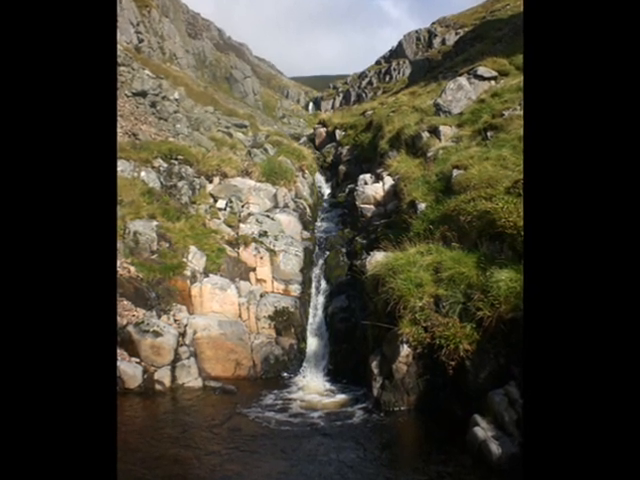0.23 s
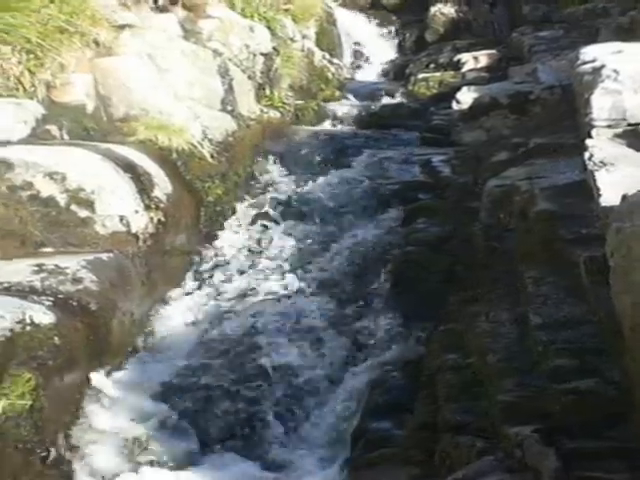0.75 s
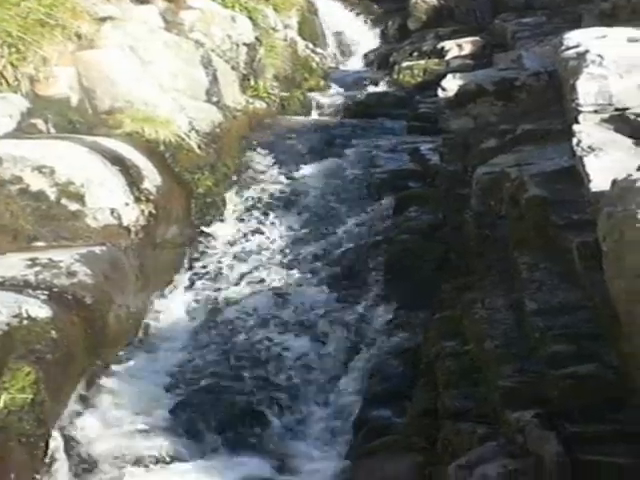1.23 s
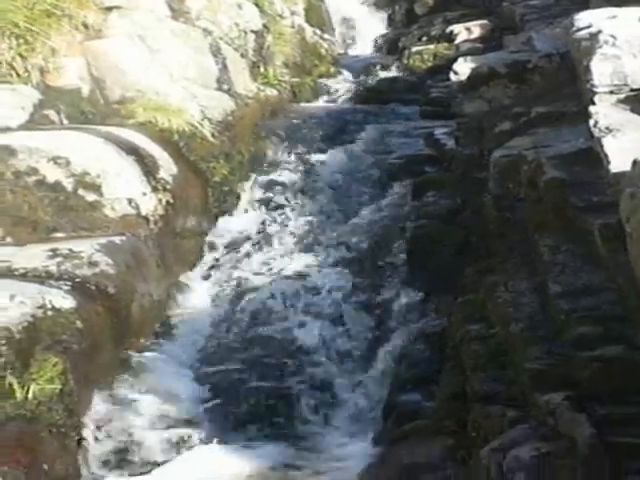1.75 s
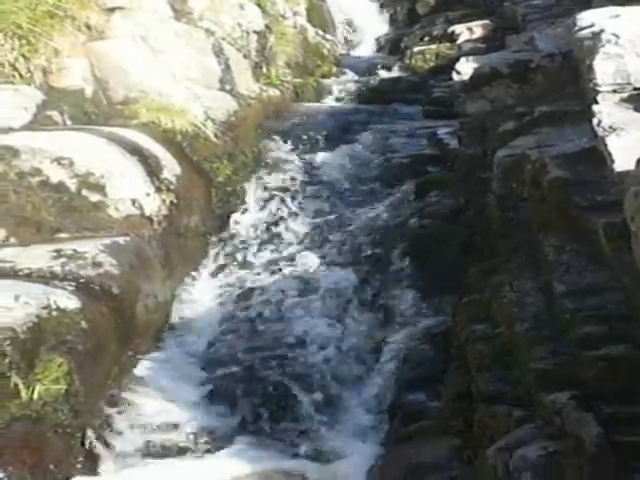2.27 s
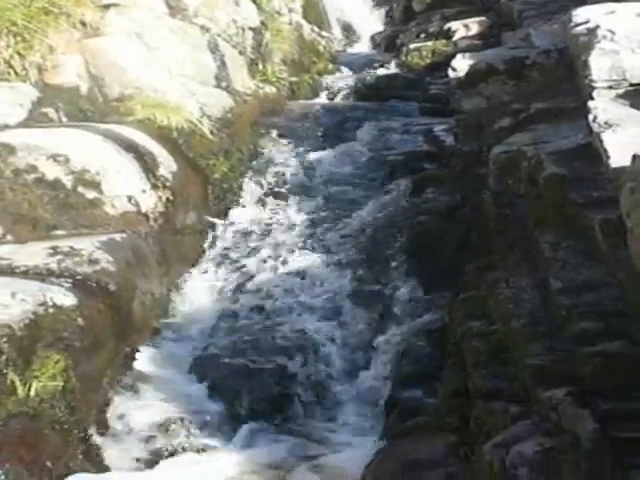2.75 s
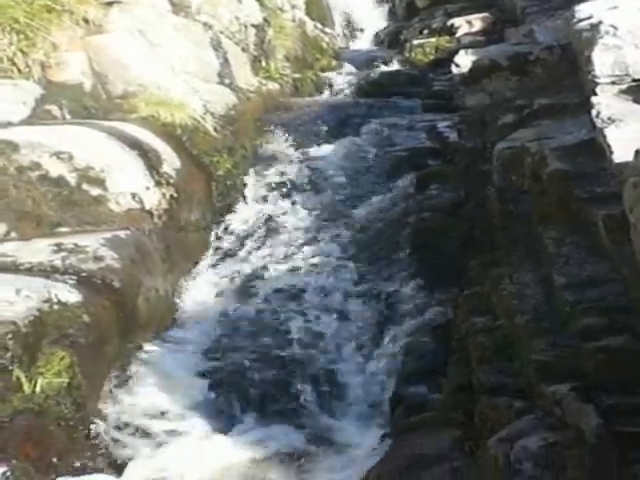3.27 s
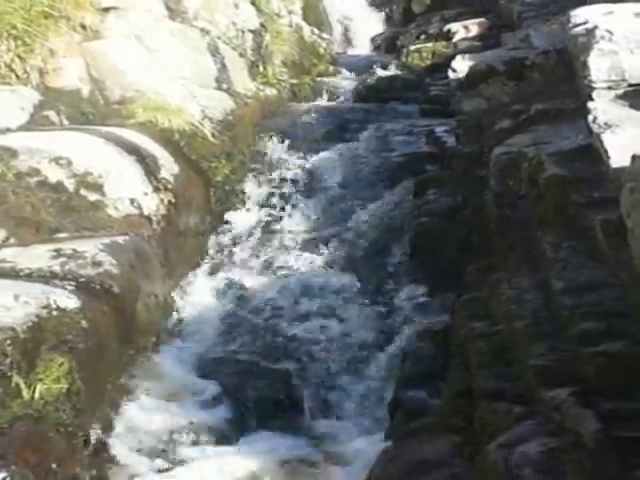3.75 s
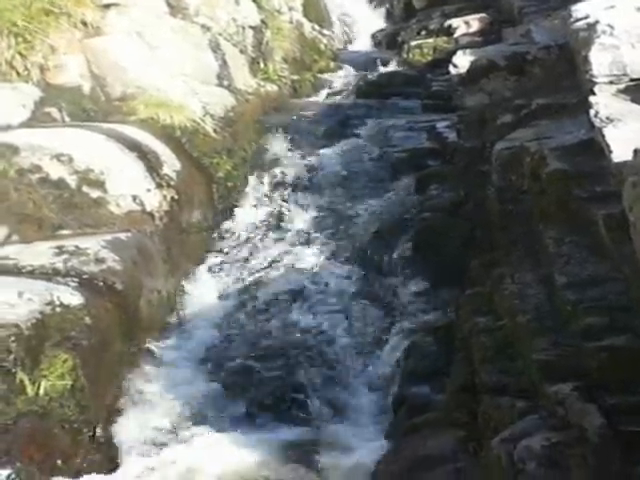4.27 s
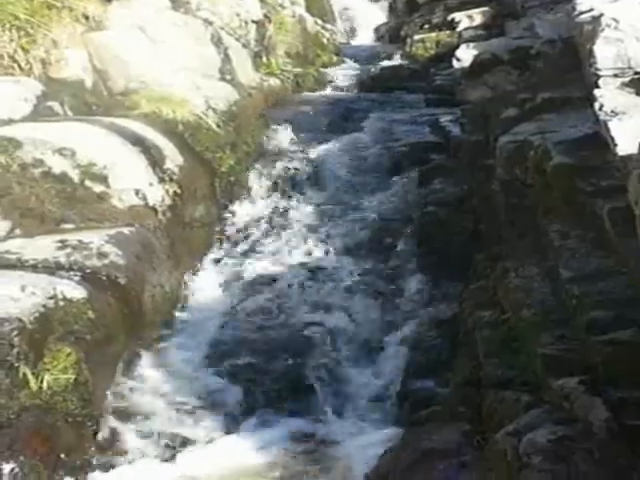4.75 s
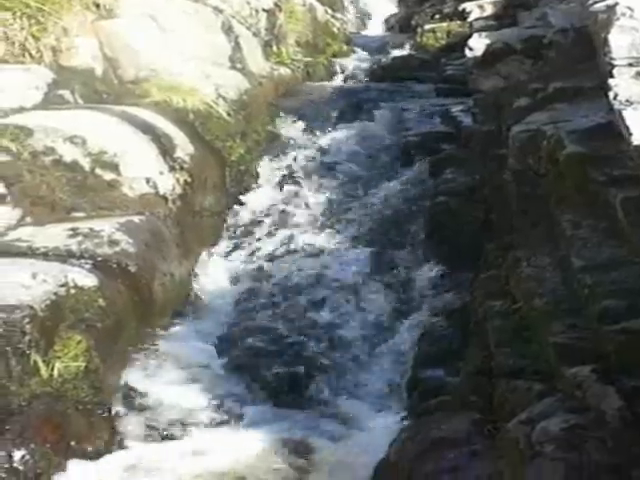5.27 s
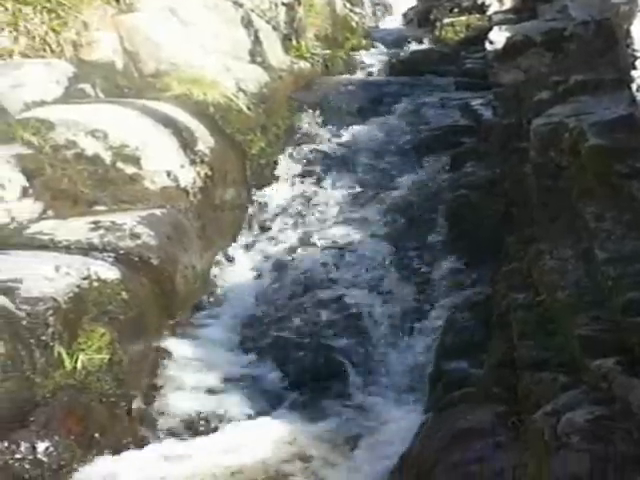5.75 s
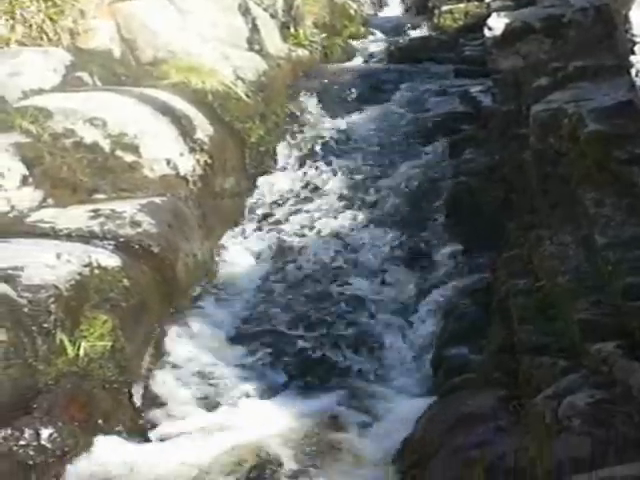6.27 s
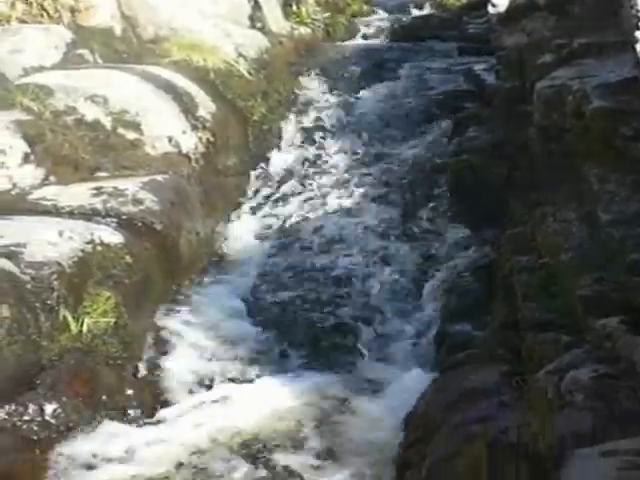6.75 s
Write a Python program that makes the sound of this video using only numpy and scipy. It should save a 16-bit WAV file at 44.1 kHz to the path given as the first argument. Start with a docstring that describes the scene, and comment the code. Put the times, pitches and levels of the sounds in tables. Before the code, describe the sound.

Complete silence for the first 0.75 seconds. Then a mountain stream cascading down a rock chute enters softly and swells to full level by about 1.1 seconds. It is a loud, close, broad rush of white water, strongest in the middle range, with little deep bass and a soft top. The level stays steady, only flickering quickly as foam tumbles. Inside it are countless ringing bubbles, low hollow gurgles between rocks and fine ticking spray. Tiny drops slap near 0.8, 1.5, 4.2 and 4.8 seconds; faint rising bubble plops come near 1.35, 3.45, 5.3, 6.3 and 6.6. From about 5.5 seconds a light breeze rumbles on the microphone, with short gusts from 5.7. Around 6.5 a soft bump, then strong low buffeting thumps at 6.7 to 7.0, slightly distorted, the water ducking beneath them until the end.

```python
"""After a silence, a mountain stream cascading down a rock chute fades in.
Octave bands of noise make its white water; random impulses in resonators make bubbles, gurgles and spray.
Bursts of noise slap as drops and rising tones plop as single bubbles over this steady rush.
Near the end wind reaches the microphone: coloured noise rumbles, short pressure swings buffet,
and the limiter ducks the water."""
import sys
import numpy as np
from scipy import signal
from scipy.fft import rfft, irfft, next_fast_len
from scipy.io import wavfile

SR = 44100
rng = np.random.default_rng(int(sys.argv[2]) if len(sys.argv) > 2 else 0)


def digitize_waveform(pressure):
    """Quantize a signal to 16-bit integers and store it at the path in sys.argv[1].

    Rows of a 2-D input are taken as channels; values are limited to [-1, 1].
    """
    field = np.atleast_2d(pressure).T
    bounded = np.clip(field, -1, 1)
    quanta = np.round(bounded * 32767).astype(np.int16)
    wavfile.write(sys.argv[1], SR, quanta)


N = 309582
TIME = np.arange(N) / SR  # seconds


def from_db(db):
    """Level to amplitude: 20 dB is a factor of ten."""
    return 10 ** (np.asarray(db) / 20)


def rms_one(x):
    """Normalise the power: scale to rms 1."""
    return x / np.sqrt(np.mean(x ** 2) + 1e-20)


def at_hz(points, hz):
    """Interpolate a spectrum in dB along a logarithmic frequency axis."""
    f, db = np.transpose(points)
    return np.interp(np.log(np.maximum(hz, 1)), np.log(f), db)


def butter(x, hz, kind, order=2):
    """Causal Butterworth filter, maximally flat in its passband."""
    sections = signal.butter(order, hz, kind, fs=SR, output="sos")
    return signal.sosfilt(sections, x + 1e-18)


def noise(spectrum):
    """Coloured noise: white noise weighted in the frequency domain, rms 1."""
    size = next_fast_len(N)
    hz = np.fft.rfftfreq(size, 1 / SR)
    white = rfft(rng.standard_normal(size))
    return rms_one(irfft(white * from_db(at_hz(spectrum, hz)), size)[:N])


def drift(rate_hz):
    """Slow random fluctuation: noise through two equal low-pass poles, rms 1."""
    step, settling = 40, 2000  # samples per slow point; slow points dropped at the start
    r = np.exp(-2 * np.pi * rate_hz * step / SR)
    white = rng.standard_normal(N // step + settling + 2)
    slow = signal.lfilter([1], [1, -2 * r, r * r], white)[settling:]
    return np.interp(np.arange(N) / step, np.arange(len(slow)), rms_one(slow))


def grains(per_s, spread_db):
    """Poisson-like impulses of either sign: many small, a few large."""
    born = np.flatnonzero(rng.random(N) < per_s / SR)
    chance = rng.random((len(born), 2))
    size = -np.log(np.maximum(chance[:, 0], np.exp(-4)))  # exponential chance, capped at 4
    out = np.zeros(N)
    out[born] = from_db(spread_db * size) * np.sign(chance[:, 1] - .5)
    return out


def resonate(x, hz, width_hz):
    """One damped resonance, a pole pair whose radius sets the bandwidth, rms 1."""
    r = np.exp(-np.pi * width_hz / SR)
    poles = [1, -2 * r * np.cos(2 * np.pi * hz / SR), r * r]
    return rms_one(signal.lfilter([1, 0, -1], poles, x + 1e-18))


def rush(surge, level_db, flicker_db, flicker_rate_hz, surge_db):
    """White water as modulated noise: tumbling foam makes each band below 6400 Hz flicker by itself."""
    # colour of the roar: f/Hz, relative level/dB per Hz
    rush_spectrum = [(25, -26), (55, -20.5), (100, -16.5), (165, -7.5), (250, -6), (600, -5.5), (900, -1.5),
                     (1600, -4.5), (2400, -4.5), (3500, -9.5), (5000, -11.5), (7000, -12), (9500, -12),
                     (12500, -14)]
    rest, flickering = noise(rush_spectrum), 0
    for edge in np.geomspace(200, 6400, 6):  # octave steps
        # forward and backward filtering keeps the phase, so the bands sum exactly
        low_pass = signal.butter(3, edge, fs=SR, output="sos")
        band = signal.sosfiltfilt(low_pass, rest)
        flickering = flickering + band * from_db(flicker_db * drift(flicker_rate_hz))
        rest = rest - band
    return from_db(level_db + surge_db * surge) * rms_one(flickering + rest)


def bubbles(surge, level_db, per_s, spread_db, q, surge_db, count=28):
    """Bubble resonance: trapped air rings for a few cycles, and small bubbles outnumber large ones."""
    # bubbles from large to small: f/Hz, relative level/dB per band
    bubble_levels = [(220, -13.5), (450, -3), (900, 0.5), (2000, -0.5), (4000, -3.5)]
    births = per_s * from_db(surge_db * surge)
    pitches = np.geomspace(bubble_levels[0][0], bubble_levels[-1][0], count)
    shares = pitches / pitches.sum()
    out = 0
    for hz, share in zip(pitches, shares):
        ringing = resonate(grains(births * share, spread_db), hz, hz / q)
        out = out + from_db(at_hz(bubble_levels, hz)) * ringing
    return from_db(level_db) * rms_one(out)


def gurgles(per_s, spread_db):
    """Cavity resonance: slugs of plunging water set the hollows between the rocks gulping."""
    # hollows: f/Hz, bandwidth/Hz, rms level/dB
    hollows = [(251.5, 49, -34.5), (388, 45, -34), (504, 71, -29), (810, 83, -33)]
    out = 0
    for hz, width_hz, db in hollows:
        out = out + from_db(db) * resonate(grains(per_s, spread_db), hz, width_hz)
    return out


def spray(surge, level_db, per_s, spread_db, low_hz, high_hz, q, surge_db, count=8):
    """Heavily damped ringing: droplets land and foam bursts in ticks of a cycle or two."""
    births = per_s / count * from_db(surge_db * surge)
    ticks = 0
    for hz in np.linspace(low_hz, high_hz, count):
        ticks = ticks + resonate(grains(births, spread_db), hz, hz / q)
    return from_db(level_db) * rms_one(ticks)


def splats(level_db, decay_s, q):
    """Exponential decay of band noise: flung drops burst on the near rock in a brief, broad patter."""
    # drops: onset t/s, relative level/dB, centre f/Hz
    drops = [(.818, -13, 4500), (1.47, -14, 3500), (4.183, -19, 5200), (4.260, -19, 6200),
             (4.702, -19, 5100), (4.854, -15, 3600)]
    out = 0
    for start_s, db, hz in drops:
        dying = (TIME >= start_s) * np.exp(-np.clip((TIME - start_s) / decay_s, 0, 20))
        patter = resonate(rng.standard_normal(N), hz, hz / q)
        out = out + from_db(db + level_db) * dying * patter
    return out


def plops(level_db, ring_cycles, rise_per_s):
    """Bubble chirp: a bubble pinches off near by and its pitch climbs as it nears the surface."""
    # loudest single bubbles: onset t/s, relative peak level/dB, starting f/Hz
    single_bubbles = [(1.351, -12, 940), (3.451, -15, 1860), (5.291, -13, 1870), (6.310, -11.5, 1250),
                      (6.600, -10.5, 1670)]
    out = np.zeros(N)
    for start_s, db, hz in single_bubbles:
        ring_s = ring_cycles / hz
        age = np.clip(TIME - start_s, 0, 20 * ring_s)
        swell = age / ring_s * np.exp(1 - age / ring_s)  # peaks at 1 after ring_s
        cycles = hz * age * (1 + rise_per_s * age / 2)  # integral of the rising pitch
        out += from_db(db + level_db) * swell * np.sin(2 * np.pi * cycles)
    return out


def envelope(start_s, length_s, attack_s, release_s):
    """Piecewise-linear amplitude: rise up to the start, hold for the length, fall away."""
    rise = np.clip(1 + (TIME - start_s) / attack_s, 0, 1)
    fall = np.clip(1 - (TIME - start_s - length_s) / release_s, 0, 1)
    return rise * fall


def wind(rumble_db):
    """Turbulent pressure noise on the microphone port; the breeze and its gusts add in power."""
    # colour of the rumble: f/Hz, relative level/dB per Hz
    rumble_spectrum = [(20, -21), (60, -4), (120, -1.5), (250, -5), (450, -12.5), (1000, -30), (3000, -52)]
    # gusts on top of the breeze: start t/s, length/s, relative level/dB
    gust_list = [(5.70, 0.088, -35), (6.037, .055, -26.5), (6.28, 0.064, -34), (6.468, 0.06, -25),
                 (6.796, 0.075, -18), (6.902, 0.033, -17), (6.978, 0.044, -18.5)]
    breeze_start_s, breeze_rise_s, breeze_relative_db = 5.48, .18, -38
    # the breeze rises and stays
    breeze = from_db(breeze_relative_db) * np.clip((TIME - breeze_start_s) / breeze_rise_s, 0, 1)
    power = breeze ** 2
    for start_s, length_s, db in gust_list:
        gust = from_db(db) * envelope(start_s, length_s, attack_s=0.013, release_s=0.018)
        power = power + gust ** 2
    return from_db(rumble_db) * np.sqrt(power) * noise(rumble_spectrum)


def buffets(level_db, width_cycles, rough, rough_hz):
    """Eddy pressure pulse: each strong eddy is one swing on the port, frayed by smaller ones."""
    # hardest eddies: centre t/s, relative peak level/dB, f/Hz
    eddies = [(6.501, -12, 330), (6.709, 0, 324), (6.718, -1.5, 348), (6.808, -4, 230), (6.826, -5.5, 160),
              (6.860, 0, 232), (6.94, -5.5, 180), (7, -0.5, 126)]
    fraying = rough * rms_one(butter(rng.standard_normal(N), rough_hz, "low"))
    out = 0
    for centre_s, db, hz in eddies:
        cycles = (TIME - centre_s) * hz
        passing = np.exp(-np.minimum((cycles / width_cycles) ** 2, 50))
        out = out + from_db(db + level_db) * passing * (np.sin(2 * np.pi * cycles) + fraying)
    return out


def scene():
    """Superposition of the stream, with one surge shared by rush, bubbles and spray, and the wind."""
    surge = drift(11)
    water = rush(surge, level_db=-18.0, flicker_db=0.7, flicker_rate_hz=22, surge_db=0.36)
    water = water + bubbles(surge, level_db=-22.5, per_s=3000, spread_db=3.5, q=11.9, surge_db=0.47)
    water = water + gurgles(per_s=190, spread_db=2.0)
    water = water + spray(surge, level_db=-24.5, per_s=3600, spread_db=4.0,
                          low_hz=3560, high_hz=11700, q=2.6, surge_db=1.0)
    water = water + splats(level_db=0, decay_s=0.0053, q=3.6)
    water = water + plops(level_db=-0.5, ring_cycles=3.7, rise_per_s=2.6)
    air = wind(rumble_db=2.5) + buffets(level_db=2, width_cycles=0.59, rough=0.21, rough_hz=890)
    return (water + air)[None]


def limiter(x, threshold_db, release_db_per_s, attack_s):
    """Gain reduction: peaks over the threshold pull the gain down; it creeps back afterwards."""
    over = np.maximum(20 * np.log10(np.abs(x) + 1e-9) - threshold_db, 0)
    # a running maximum on a tilted axis holds each peak and releases it at a steady rate
    tilt = release_db_per_s * TIME
    held = np.maximum.accumulate(over + tilt, axis=-1) - tilt
    r = np.exp(-1 / (attack_s * SR))
    reduction_db = signal.lfilter([1 - r], [1, -r], held)
    return x * from_db(-reduction_db)


def record(dry):
    """Transmission chain: bass cut, notches, limiter, rounded peaks, linear fade-in, treble cut."""
    # narrow notches in the response: f/Hz, bandwidth/Hz
    notches = [(7265, 230), (7850, 330)]
    cutoff_hz = 12300
    start_s, fade_s, fade_from_db = .744, 0.39, -14
    x = butter(dry, 25, "high")
    x = butter(x, cutoff_hz + 1000, "low", order=8)
    for hz, width_hz in notches:
        x = signal.lfilter(*signal.iirnotch(hz, hz / width_hz, fs=SR), x)
    x = limiter(x, threshold_db=-2.0, release_db_per_s=37, attack_s=0.0021)
    x = .9 * x / (.9 ** 6 + x ** 6) ** (1 / 6)  # saturates smoothly towards 0.9
    # silence before the start
    x = x * np.interp(TIME, [start_s, start_s + fade_s], [from_db(fade_from_db), 1], left=0)
    steep_low_pass = signal.ellip(12, .1, 90, cutoff_hz, fs=SR, output="sos")
    return signal.sosfilt(steep_low_pass, x)


dry = scene()
out = record(dry)
digitize_waveform(out)
```